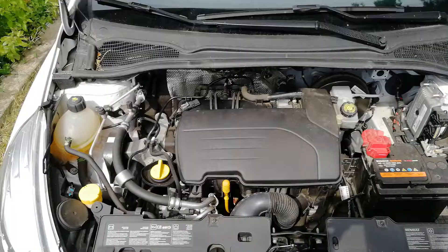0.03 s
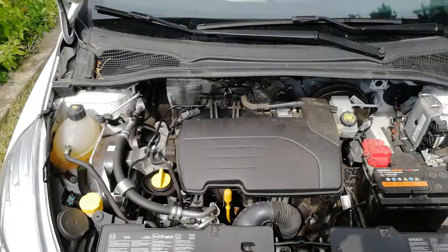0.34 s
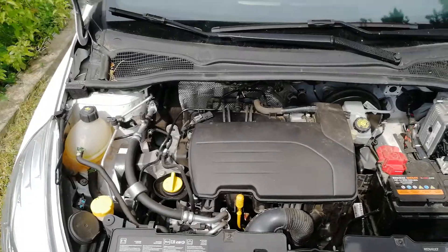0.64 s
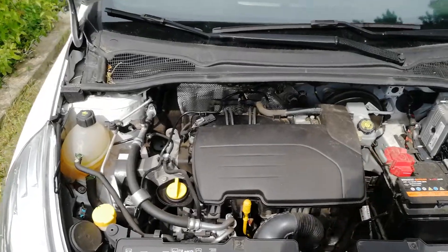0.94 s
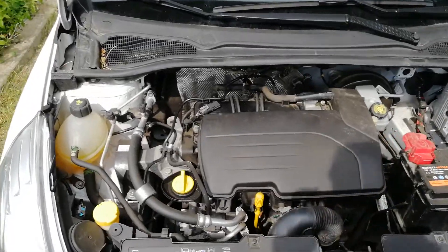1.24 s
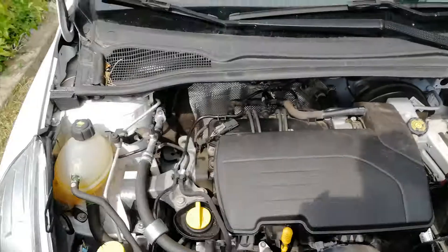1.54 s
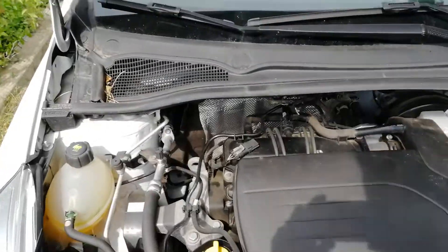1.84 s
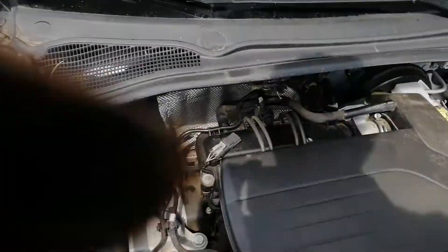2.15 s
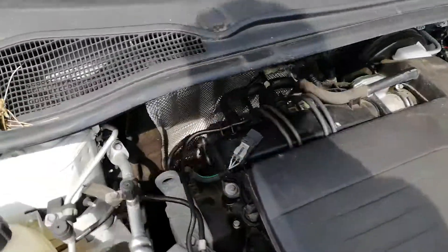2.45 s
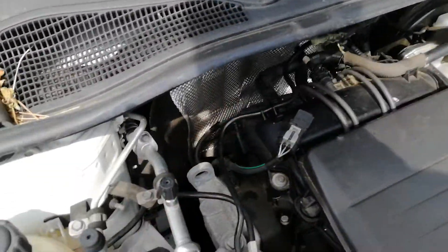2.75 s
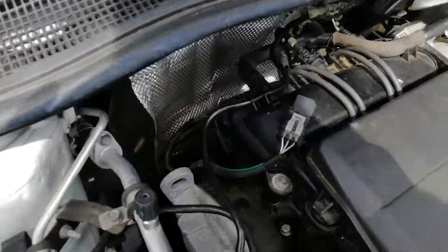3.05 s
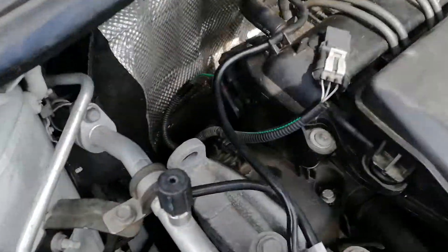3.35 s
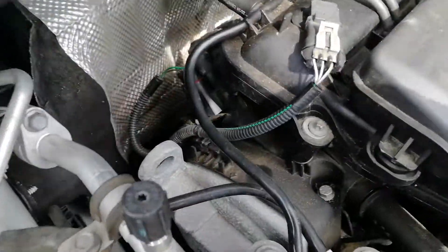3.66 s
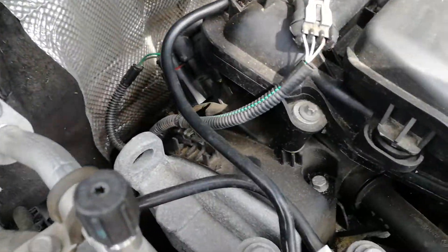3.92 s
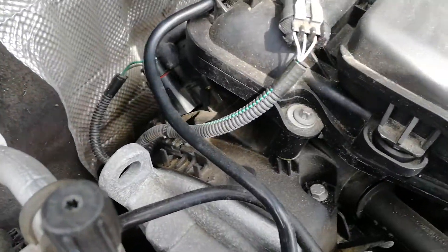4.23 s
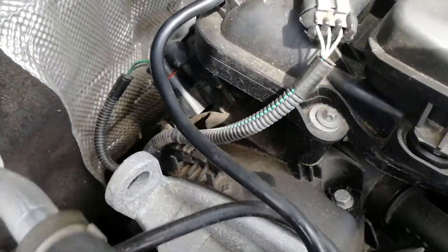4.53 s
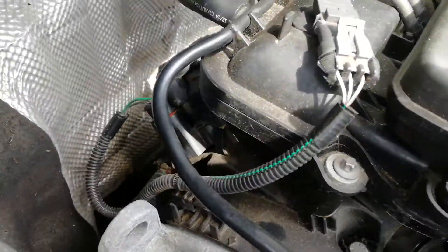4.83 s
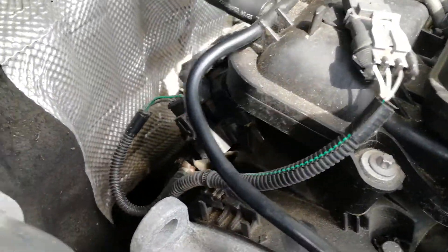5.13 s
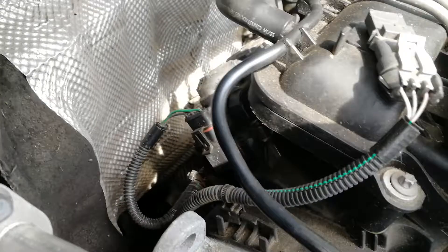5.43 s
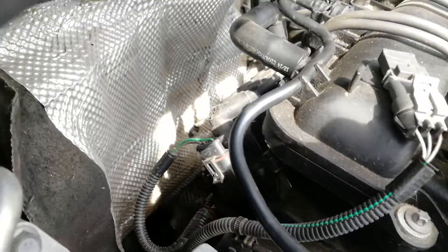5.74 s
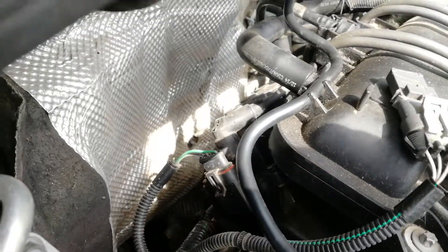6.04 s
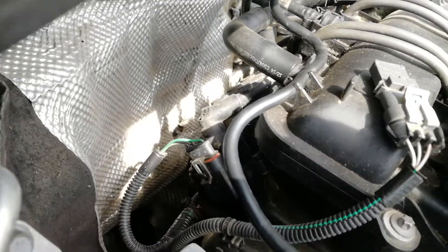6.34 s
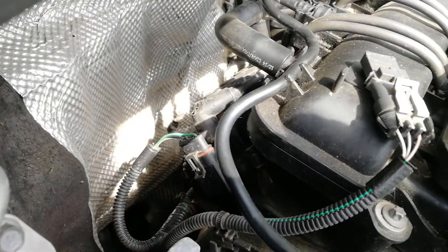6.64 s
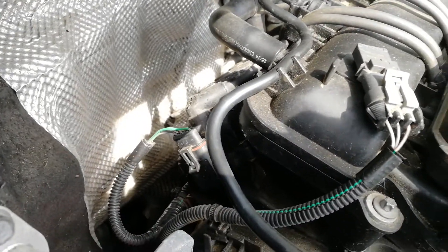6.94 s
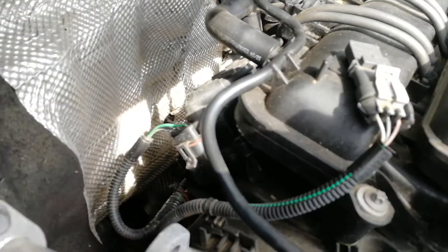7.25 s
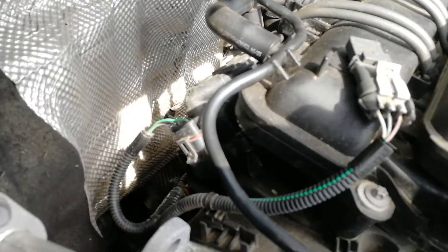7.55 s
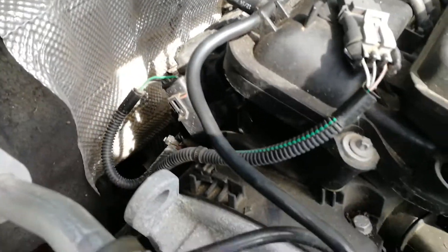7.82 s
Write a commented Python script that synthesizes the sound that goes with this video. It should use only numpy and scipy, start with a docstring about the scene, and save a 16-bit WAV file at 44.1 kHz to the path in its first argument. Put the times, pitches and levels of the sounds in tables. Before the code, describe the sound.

A four-cylinder car engine idles under an open bonnet outdoors, with fast, crisp ticking over a wash of machine noise and a soft exhaust throb. The microphone moves in from the front of the car and everything grows louder. A few faint puffs of air brush it on the way. Close up, a dry belt pulley sings at one steady pitch with a rapid, rough, squealing rasp that lasts to the end.

```python
"""At the open bonnet of a car, a microphone moves in close to the belt end of an idling four-cylinder engine.
Fuel injectors and valves tick at every firing. A dry belt pulley sings at a fixed pitch and
rasps twice a turn as the belt rubs it. Behind them are a wash of machine noise and the soft throb
of the exhaust. A few puffs of air brush the microphone."""
import sys
import numpy as np
from scipy import signal
from scipy.fft import rfft, irfft, next_fast_len
from scipy.io import wavfile
from scipy.ndimage import map_coordinates

SR = 44100
rng = np.random.default_rng(int(sys.argv[2]) if len(sys.argv) > 2 else 0)


def inscribe(sig):
    """Save sig as 16-bit PCM at rate SR to the path in sys.argv[1].

    A 1-D sig is mono; a 2-D sig holds one channel per row.
    Samples are clipped to [-1, 1] before scaling.
    """
    pcm = np.round(np.clip(np.atleast_2d(sig).T, -1, 1) * 32767)
    wavfile.write(sys.argv[1], SR, pcm.astype(np.int16))


N = 351918
TIME = np.arange(N) / SR

# How hard each cylinder ticks, in firing order: (injector [dB], valve [dB])
CYLINDER_TICKS = [(-3.5, -0.5), (0.5, -4.5), (-7, 4.5), (-9, 1)]
# Tone colour of an injector's snap: (frequency [Hz], level [dB])
INJECTOR_COLOUR = [(800, -22), (2500, 2), (5000, 1.5), (7000, 5), (8600, 11), (11000, -2), (13200, 4.5),
                   (16000, -9)]
# Tone colour of a valve's clack: (frequency [Hz], level [dB])
VALVE_COLOUR = [(800, -19), (3000, -3.5), (5500, -2.5), (6900, 1), (7600, 4.5), (8900, 8), (10500, -11.5),
                (13500, -34), (16000, -19)]
# Hiss of the parts that move the valves: (frequency [Hz], level [dB])
HISS_COLOUR = [(1000, -61), (2500, 1), (4500, -6.5), (6800, -3), (7600, -1.5), (9000, 4.5), (10300, -8),
               (11500, -8.5), (13500, -8.5), (16000, -14)]
# The pulley's hum, shielded from the front of the car: (time [s], gain [dB])
HUM_GAIN = [(.3, -72), (.8, -69), (1.35, -53.5), (2.3, -50), (3.4, -40), (4.7, -37), (7.9, -36.5)]
# Breathy noise around the hum: (frequency [Hz], level [dB])
BREATH_COLOUR = [(250, -28), (400, -4.5), (440, 6), (520, 3), (585, -1), (650, -52), (1500, -58)]
# The pulley's rough upper tones: (pitch [Hz], gain at spot 0 [dB], at spot 1 [dB], at spot 2 [dB],
# at spot 3 [dB], swell at each rub [dB], left over right [dB])
SQUEAL_TONES = [(1594, 0, -1.5, 3.2, -1, 10.5, -5), (2140, -9, 1.5, -1.5, -12, 10, -11),
                (2624, 5.5, -0.5, -5.5, 1, 12.5, -4), (3138, -5, -7, 0, -1, 14, -2),
                (3708, -24, -5, -9, -7.5, 11, 9), (4263, -23, -13, -9, -16, 8, 3),
                (4680, -16, -5.5, -16, -19, 12, 13)]
# The belt's dry scrape: (frequency [Hz], level [dB])
SCRAPE_COLOUR = [(700, -52), (1500, 4.5), (2400, -4), (3500, 4.5), (4700, 4.5), (5800, 4.5), (6900, 2.5),
                 (8000, 11.5), (9500, -2), (11500, -10), (16000, -9)]
# Machine noise of the engine block: (frequency [Hz], level [dB])
BLOCK_COLOUR = [(30, -24), (80, -7), (160, -10), (260, -1), (340, -4.5), (440, 1), (630, 1), (880, -0.5),
                (1020, 7), (1350, 6.5), (1800, 5.5), (2300, 4), (4000, -5), (9000, -20)]
# Exhaust tones at 1, 2, 3... times the firing rate: (level [dB])
THROB_LEVELS = [-73, -63, -65.5, -59.5, -64.5, -62, -67.5]
# Drone of the engine bay: (frequency [Hz], level [dB])
DRONE_COLOUR = [(25, -2), (70, -18), (115, -7), (160, 9), (250, -1.5), (380, -15), (700, -14)]
# Puffs of air: (time [s], peak level [dB], half length [s])
AIR_PUFFS = [(2.38, -58, .09), (2.743, -50, 0.055), (3.07, -56, 0.12), (3.52, -43.5, 0.15)]
# Rumble of air on the microphone: (frequency [Hz], level [dB])
PUFF_COLOUR = [(15, -6), (35, 6.5), (80, -1), (150, -4), (300, -43), (900, -73)]
# Where the engine's covers and brackets ring or sound hollow: (frequency [Hz], width [Hz], lift [dB])
COVER_RESONANCES = [(702, 30, 8), (1236, 30, 4), (1295, 70, -5), (2000, 20, 4), (2400, 220, -3.5),
                    (3170, 130, 3), (3480, 120, -2), (3700, 140, 2), (4450, 130, -3), (5700, 120, 3),
                    (7480, 130, 6), (7800, 140, 4.5)]
# How alike the noise is left and right: (frequency [Hz], likeness [0 to 1])
STEREO_LIKENESS = [(60, .97), (160, .93), (330, .55), (600, 0), (2000, 0), (16000, 0)]
# Which side the noise leans to: (frequency [Hz], left over right [dB])
STEREO_LEAN = [(150, 1), (400, 1), (700, 3.5), (1100, 3), (2000, -7), (3200, -1.5), (5000, 2), (8200, 6),
               (10500, 7), (13000, -8)]
# The microphone's path: (time [s], spot [0 to 3])
# 0 is in front of the car, 1 over the engine cover, 2 down by the belt, 3 at the heat shield.
MIC_SPOT = [(.9, 0), (1.65, .85), (2.65, 1.1), (3.2, 2), (5.25, 2.3), (5.9, 3)]
# How far the microphone is from the belt end: (time [s], distance [m])
MIC_DISTANCE = [(.3, 1.05), (1.4, 0.78), (2.1, 0.48), (2.9, .26), (4.2, .2), (5.2, .18), (7.9, 0.18)]


def ticking(firings, closeness):
    """An injector snaps at each firing and a valve clacks with it, over the hiss of moving parts."""
    injector_db, valve_db = np.transpose(CYLINDER_TICKS)
    snap = impacts(firings, injector_db, rise_s=.008, fade_s=.034, scatter_db=1)
    clack = impacts(firings, valve_db, rise_s=.014, fade_s=.06, scatter_db=1.3)
    injectors = amp(5.5 + 2.2 * closeness) * snap * noise(INJECTOR_COLOUR)
    valves = amp(.45) * clack * noise(VALVE_COLOUR)
    hiss = amp(-3 + .51 * wobble(350) + 1.8 * wobble(70)) * noise(HISS_COLOUR)
    return injectors + valves + hiss


def impacts(firings, cylinder_db, rise_s, fade_s, scatter_db, early_firings=.14):
    """Loudness curve of one hit per firing, each cylinder at its own strength."""
    count = np.arange(1, int(firings[-1]) + 1)
    time_luck, size_luck = rng.standard_normal((len(count), 2)).T
    times = np.interp(count - early_firings, firings, TIME, right=TIME[-1]) + .00067 * time_luck
    sizes = amp(cylinder_db[count % len(cylinder_db)] + scatter_db * size_luck)
    hits = np.bincount(np.clip(times * SR, 0, N - 1).astype(int), sizes, N)
    t = TIME[:SR // 10]
    ring = (1 - np.exp(-t / rise_s)) * np.exp(-np.log(1000) * t / fade_s)
    return signal.fftconvolve(hits, ring / ring.max())[:N]


def pulley(turns, spot, closeness, hum_db, rasp_db):
    """The dry pulley hums throughout and rasps twice a turn, one rub harder than the other."""
    note, octave = hum(turns, closeness)
    octave = octave * amp(np.interp(spot, range(4), [-3.5, -7, -.5, -3]))
    force = amp(.36 * wobble(22) - 3.28 * np.cos(2 * np.pi * turns))
    rasp = squeal(turns, spot) + scrape(turns)
    return amp(hum_db) * note + amp(rasp_db) * (octave + force * rasp)


def hum(turns, closeness, pitch_hz=536.2, sag_rad=.38):
    """The pulley's note and its fluttering octave; each rub drags the note down and weakens it."""
    rub_angle = 4 * np.pi * turns
    phase = 2 * np.pi * pitch_hz * TIME - sag_rad * np.sin(rub_angle)
    phase += .11 * wobble(14) + .055 * wobble(150)
    stereo_phase = split(1.56)
    strength = amp(4 - 1.9 * np.cos(rub_angle) + .8 * wobble(29))
    note = strength * np.sin(phase + stereo_phase) * pan(8.7)
    breath = amp(-9.5 + 1.4 * closeness) * noise(BREATH_COLOUR)
    flutter = amp(1.1 * np.cos(rub_angle) + 2.2 * wobble(110))
    octave = flutter * np.sin(2 * phase + 1.18 * wobble(60) - stereo_phase)
    return note + breath, octave


def squeal(turns, spot, roughness_rad=.33):
    """Rough high tones swell at each rub, catching at a slightly different pitch every time."""
    tones = 0
    for hz, *spot_db, swell_db, lean_db in SQUEAL_TONES:
        level_db = np.interp(spot, range(4), spot_db) + 3.5 + 3.4 * wobble(130)
        stray_hz = .011 * hz * wobble(85)
        phase = 2 * np.pi * (hz * TIME + np.cumsum(stray_hz) / SR)
        phase = phase + roughness_rad * np.array([wobble(240), wobble(240)]) + split(-1.69)
        tones += amp(level_db) * rubbing(turns, swell_db) * np.sin(phase) * pan(lean_db)
    return tones


def scrape(turns, lap_hz=527, feedback=.5):
    """A grainy scrape runs round the pulley, so it rings near the multiples of the pulley's note."""
    grains = amp(4.5 + 1.3 * wobble(600))
    friction = noise(SCRAPE_COLOUR)
    lap = round(SR / lap_hz)
    ringing = sum(feedback ** k * np.roll(friction, k * lap, axis=1) for k in range(4))
    return grains * rubbing(turns, depth_db=14) * unit(ringing)


def rubbing(turns, depth_db):
    """Loudness curve of the belt's rub, which peaks twice in each turn of the pulley."""
    return amp(depth_db * (np.cos(4 * np.pi * turns) - 1) / 2)


def engine_block(level_db):
    """The running engine gives off a wash of noise that flickers a little."""
    return amp(level_db + 1.43 * wobble(60)) * noise(BLOCK_COLOUR)


def exhaust_throb(firings, closeness, late_firings=.348):
    """One soft push of air per firing, duller from afar, over the drone of the engine bay."""
    dulling_db = -7 * (1 - closeness)
    phase = 2 * np.pi * (firings - late_firings)
    pulses = sum(amp(db + dulling_db * min(k / 3, 1)) * np.cos((k + 1) * phase)
                 for k, db in enumerate(THROB_LEVELS))
    drone = amp(-56.5 + .6 * wobble(33)) * noise(DRONE_COLOUR)
    return amp(.67 * wobble(8.8)) * pulses + drone


def air_puffs():
    """Each puff of air swells, rumbles on the microphone and dies away."""
    swells = sum(amp(db) * np.exp(-((TIME - peak_s) / half_s) ** 2) for peak_s, db, half_s in AIR_PUFFS)
    return swells * amp(1.8 * wobble(25)) * noise(PUFF_COLOUR)


def crankshaft(idle_hz=11.047, step_hz=.123, step_s=4.1, cut_turns=.345, cut_s=5.445):
    """Turns of the engine's main shaft so far; it speeds up slightly once."""
    turns = idle_hz * TIME - .125 + step_hz * np.maximum(TIME - step_s, 0)
    # the sound jumps ahead about 30 ms once, like a small cut
    return turns + cut_turns * (TIME > cut_s)


def noise(colour):
    """Stereo noise of strength 1, shaped by a tone colour and by the engine's covers."""
    size = next_fast_len(N)
    hz = np.fft.rfftfreq(size, 1 / SR)
    covers_db = sum(db / (1 + (2 * (hz - centre) / width) ** 2) for centre, width, db in COVER_RESONANCES)
    spectra = rfft(rng.standard_normal((2, size))) * amp(look_up(colour, hz) + covers_db)
    spread = np.arccos(look_up(STEREO_LIKENESS, hz)) / 2
    mid, side = spectra * [np.cos(spread), np.sin(spread)]
    left_right = np.array([mid + side, mid - side]) * pan(look_up(STEREO_LEAN, hz))
    return unit(irfft(left_right, size)[:, :N])


def amp(db):
    """Turn decibels into a gain."""
    return 10 ** (np.asarray(db) / 20)


def unit(x):
    """Scale a sound to an average strength (rms) of 1."""
    return x / np.sqrt(np.mean(x ** 2) + 1e-20)


def look_up(table, hz):
    """Read a (frequency, value) table, with octaves evenly spaced."""
    freqs, values = np.transpose(table)
    return np.interp(np.log(hz + 1), np.log(freqs + 1), values)


def over_time(table):
    """Read a (time, value) table at every sample."""
    return np.interp(TIME, *np.transpose(table))


def wobble(rate):
    """A smooth curve through rate random values a second."""
    return map_coordinates(rng.standard_normal(int(N * rate / SR) + 4), [TIME * rate])


def split(gap):
    """Half of a gap up for the left side, half down for the right."""
    return np.array([[.5], [-.5]]) * gap


def pan(lean_db):
    """Left and right gains that keep the total power the same."""
    gains = amp(split(lean_db))
    return gains / np.sqrt(np.mean(gains ** 2, axis=0))


def scene(near_m=.18):
    """The crankshaft times the ticks, rubs and throb; the engine grows louder as the microphone nears."""
    crank = crankshaft()
    firings = 2 * crank
    pulley_turns = 1.0762 * crank + .21
    spot = over_time(MIC_SPOT)
    closeness = np.minimum(spot / 2, 1)
    # block, rasp and ticks each lose a few dB whenever the distance doubles
    doublings = np.log2(over_time(MIC_DISTANCE) / near_m)
    block = engine_block(level_db=-35 - 3 * doublings)
    belt = pulley(pulley_turns, spot, closeness, hum_db=over_time(HUM_GAIN), rasp_db=-34 - 4.5 * doublings)
    ticks = amp(-29.5 - 6 * doublings) * ticking(firings, closeness)
    return ticks + belt + block + exhaust_throb(firings, closeness) + air_puffs()


def record(dry, opens_s=.289, top_hz=15950):
    """The microphone opens after a moment and keeps nothing above top_hz."""
    size = next_fast_len(N + SR // 2)
    passed = np.fft.rfftfreq(size, 1 / SR) < top_hz
    return irfft(rfft(dry * (TIME > opens_s), size) * passed, size)[:, :N]


dry = scene()
out = record(dry)
inscribe(out)
```